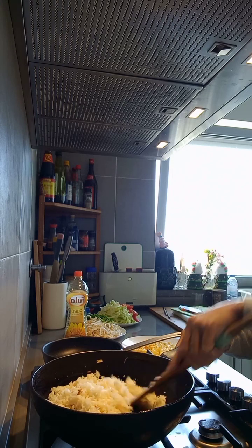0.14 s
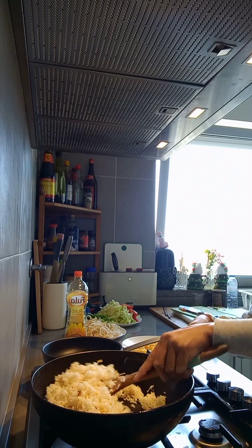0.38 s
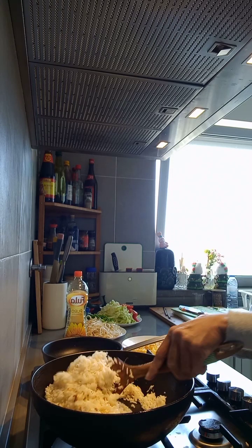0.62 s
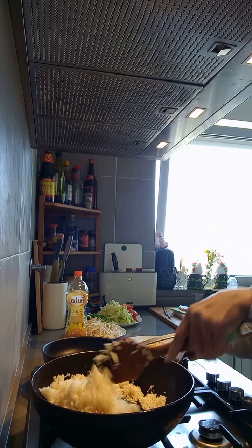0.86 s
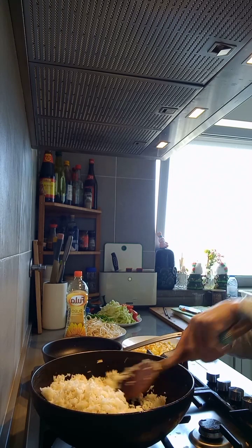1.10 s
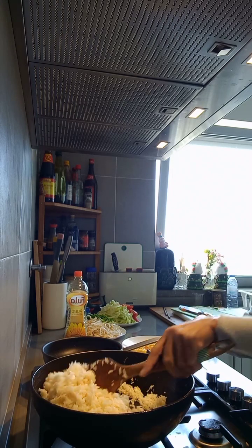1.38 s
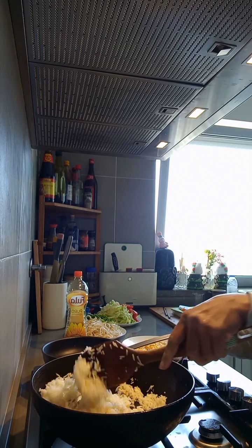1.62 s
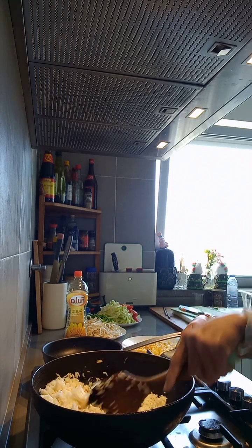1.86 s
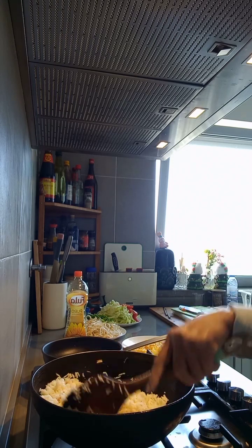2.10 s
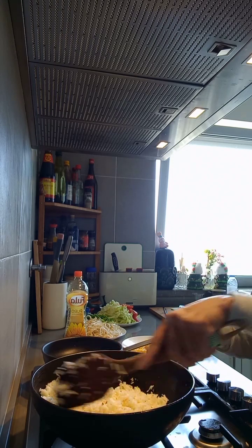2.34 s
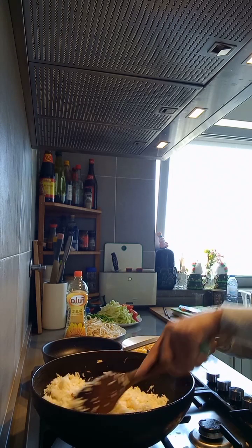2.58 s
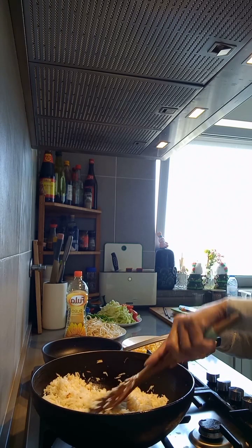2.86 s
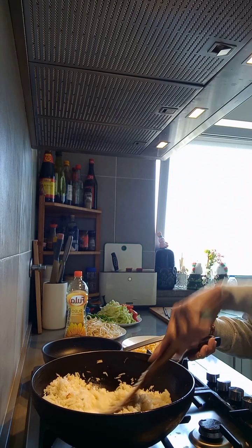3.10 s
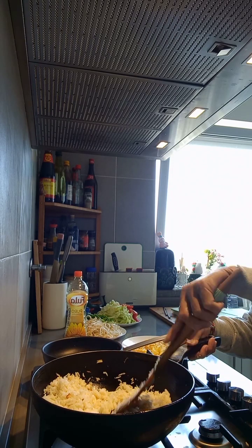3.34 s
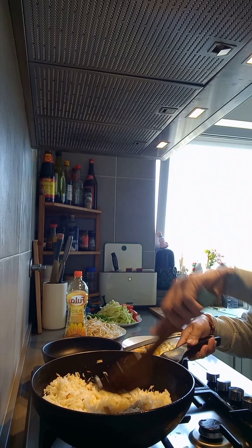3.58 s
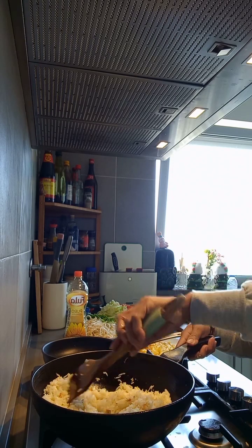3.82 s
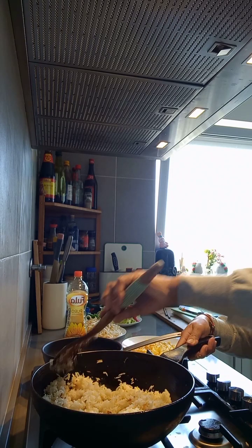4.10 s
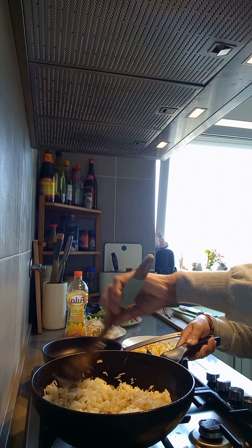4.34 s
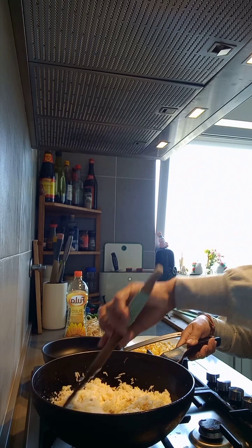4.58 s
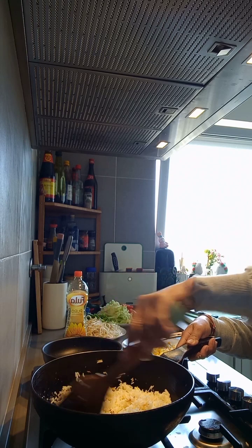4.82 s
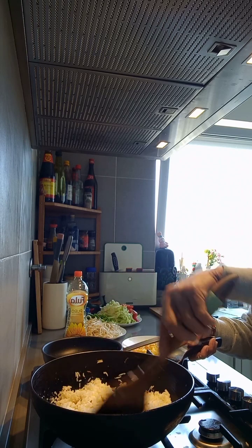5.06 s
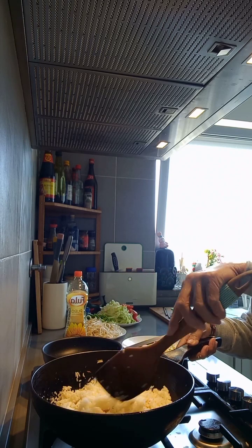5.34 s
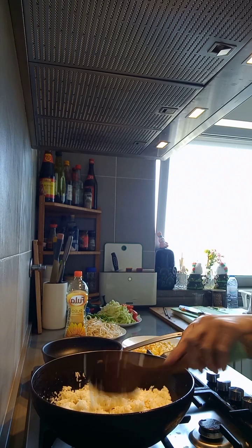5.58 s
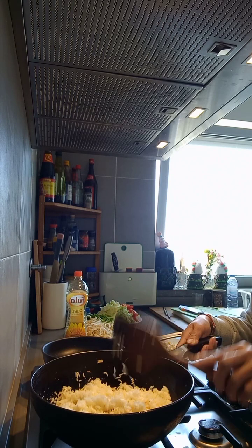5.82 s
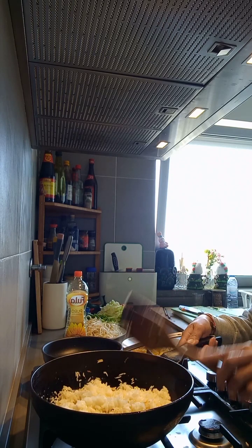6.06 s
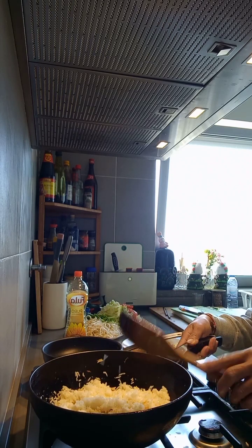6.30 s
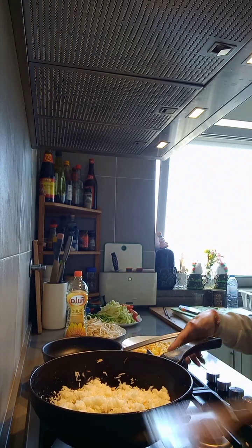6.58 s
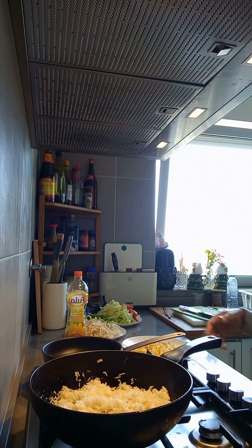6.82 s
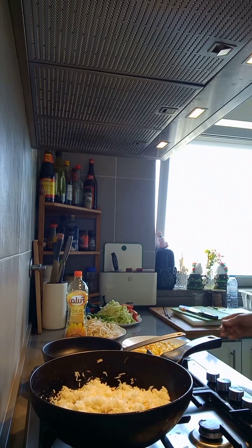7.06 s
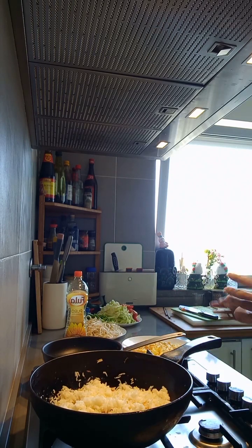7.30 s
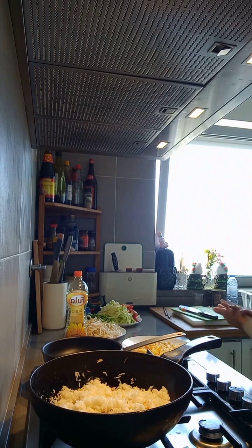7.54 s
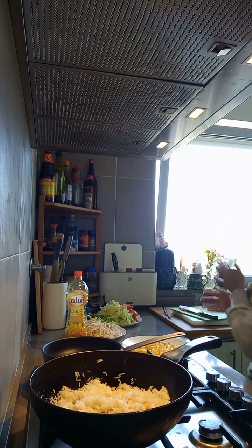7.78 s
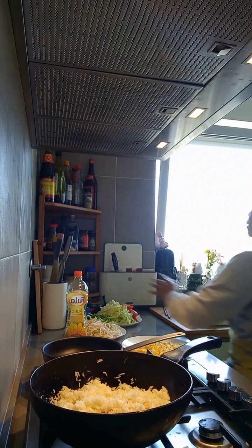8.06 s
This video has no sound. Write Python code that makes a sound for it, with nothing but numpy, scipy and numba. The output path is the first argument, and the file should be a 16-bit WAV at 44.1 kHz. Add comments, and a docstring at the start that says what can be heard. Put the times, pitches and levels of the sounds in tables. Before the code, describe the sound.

In a tiled home kitchen, rice fries with a dense crackling hiss over a low cooker-hood drone. A wooden spatula scrapes and softly thuds through the wok for several seconds, then raps the rim three times, loud and metallic, the wok rattling on its grate. A light touch and a hard dish knock follow, then only quieter sizzle. Close stereo phone microphone.

```python
"""Fat sizzles and a cooker hood drones; wood scrapes and nudges through rice in a steel wok, raps
three times on its rim, touches the worktop and knocks a dish; the level sags after the loud raps.
Sizzle, hood and scraping are shaped noise; every blow rings a bank of decaying modes plus a noise
crack. Frying and blows get a room tail; a phone close by on the worktop adds two unlike ports and
a slow gain control."""
import sys
import numpy as np
from scipy import signal
from scipy.fft import rfft, irfft
from scipy.io import wavfile
from scipy.ndimage import uniform_filter1d
from numba import njit

SR = 44100
rng = np.random.default_rng(int(sys.argv[2]) if len(sys.argv) > 2 else 0)


def store_wav(level_fs):
    """Save 16-bit WAV to argv[1]."""
    pcm = np.round(np.clip(np.atleast_2d(level_fs), -1, 1) * 32767)
    wavfile.write(sys.argv[1], SR, pcm.T.astype(np.int16))


def boost(x):
    """Linear amplitude factor 10**(x/20) for a level x in decibels (scalar or array-like)."""
    u = np.asarray(x, float) / 20
    return 10 ** u


N = 360288
TIME_S = np.arange(N) / SR
LEAD_SAMPLES = 18  # near sound reaches the left port first

# spatula strokes through the rice: start/s, length/s, hob rumble/dB, wood-on-steel scrape/dB,
# flare of the sizzle as fresh rice meets hot steel/dB
STROKES = [(-0.1, 0.75, -32, -38.5, -2.5), (0.715, 0.81, -35.5, -39, 2), (1.14, 0.32, -39, -42, 3.5),
           (1.594, 0.61, -33, -39.5, 0), (2.067, 0.34, -34.5, -37, 2.5), (2.482, 0.2, -36, -40, 4),
           (2.74, 0.34, -36, -42, 2.5), (3.091, 0.19, -35.5, -32.5, -3), (3.367, 1, -40.5, -47, 1),
           (3.832, 0.29, -34, -33.5, 0.5), (4.148, 0.27, -36, -32, 1.5), (4.455, .26, -32.5, -37, 2.5),
           (4.73, 0.46, -39, -44, 1.5), (5.088, 0.3, -42, -33, -1.5), (5.44, 0.73, -38.5, -43, 0.5)]


def shape(x, points):
    """Colour x by (f/Hz, gain/dB) points, interpolated over log frequency."""
    hz, db = np.transpose(points)
    f = np.fft.rfftfreq(x.shape[-1], 1 / SR)
    gain = boost(np.interp(np.log(f + 1), np.log(hz), db))
    return irfft(rfft(x) * gain, x.shape[-1])


def pair(size):
    """Two-port noise: alike in the bass, mostly unrelated in the treble but for a part that leads left."""
    alike_hz = 650  # likeness falls off around here
    f = np.fft.rfftfreq(size, 1 / SR)
    alike = np.exp(-(f / alike_hz) ** 2)
    mid, side, near = rfft(rng.standard_normal((3, size)))
    mid = mid * np.sqrt((1 + alike) / 2)
    side = side * np.sqrt((1 - alike) / 2)
    near = near * 0.39 * np.sqrt(1 - alike) / (1 + (f / 4000) ** 2)
    delay = np.exp(-2j * np.pi * f * LEAD_SAMPLES / SR)
    return irfft(np.array([mid + side + near, mid - side + near * delay]), size)


def level(x, db):
    """Scale x to an rms level, fixed or moving."""
    return x * boost(db) / np.sqrt(np.mean(x ** 2))


def walk(rate_hz):
    """Random levels held 1 / rate_hz and slewed twice; spread near 1."""
    hold = int(SR / rate_hz)
    steps = np.repeat(rng.standard_normal(N // hold + 1), hold)
    return 1.3 * uniform_filter1d(uniform_filter1d(steps, hold), hold)[:N]


def fade(t60_s, size):
    """Exponential decay, 60 dB in t60_s."""
    return np.exp(-np.log(1000) * np.arange(size) / (t60_s * SR))


def pressure():
    """Blade pressure 0-1 of each stroke: a smooth build-up and a longer easing off."""
    rise = 0.24  # share of a stroke
    start_s, length_s = np.array(STROKES)[:, :1], np.array(STROKES)[:, 1:2]
    part = (TIME_S - start_s) / length_s
    ramp = np.clip(np.minimum(part / rise, (1 - part) / (1 - rise)), 0, 1)
    return np.sin(np.pi / 2 * ramp) ** 2


def hood():
    """Broad drone of air in the extractor duct: shaped noise whose level wanders slightly."""
    # drone spectrum: f/Hz, gain/dB
    drone = [(18, -51), (30, -41), (43, -13), (102, 2), (177, -12), (339, -13.5), (439, -24), (710, -16.5),
             (955, -23), (1050, -15.5), (1150, -23.5), (1970, -22), (2500, -58), (3250, -52), (5500, -120)]
    return level(shape(pair(N), drone), -40.5 + 0.7 * walk(3))


def frying():
    """Dense steam bursts of very uneven size gate a hiss; patches of fat flare and die; spits stand out."""
    # fat boiling on the hot steel: t/s, level/dB
    boil = [(0.0, -33.5), (1.1, -37.5), (1.55, -38), (3.0, -35.5), (4.0, -40), (5.5, -37.5), (6.3, -40),
            (6.9, -38.5), (7.4, -41), (7.75, -36), (8.17, -40)]
    # loud spits of fat: t/s, level/dB
    spits = [(2.577, -19), (3.296, -21.5), (3.9794, -24.5), (5.1264, -27), (5.616, -30), (6.7046, -26),
             (7.4699, -29.5), (7.7103, -23.5), (8.024, -23), (8.1377, -30.5)]
    # hiss spectrum: f/Hz, gain/dB
    sizzle = [(300, -18), (900, -32), (1600, -7.5), (2500, -0.5), (5000, -0.5), (9000, -2.5), (15000, 9)]
    # spits carry less top than the hiss: f/Hz, gain/dB
    spit_dull = [(4000, -2), (15000, -6)]
    burst_hz, burst_decay_s = 2500, 0.0009  # decay of burst power
    flare_hz, flare_decay_s, spit_t60_s = 20, 0.0094, 0.055

    bursts = (rng.random(N) < burst_hz / SR) * boost(3.7 * np.minimum(rng.exponential(size=N), 5))
    power = signal.lfilter([1], [1, -np.exp(-1 / (burst_decay_s * SR))], bursts ** 2)
    gate = 0.5 + np.sqrt(power)
    flares = (rng.random(N) < flare_hz / SR) * rng.random(N)
    swell = 1 + 0.83 * signal.lfilter([1], [1, -np.exp(-1 / (flare_decay_s * SR))], flares)
    hiss = shape(pair(N) * gate * swell, sizzle)

    out = 0
    for hz in 300 * 2. ** np.arange(6):  # each octave wavers faintly on its own
        band = [(hz / 2, -60), (hz / 1.46, -6), (hz, 0), (hz * 1.43, -6), (hz * 2, -60)]
        out = out + shape(hiss, band) * boost(0.11 * walk(14))
    flare_db = np.transpose(STROKES)[4] @ pressure()
    out = level(out, np.interp(TIME_S, *np.transpose(boil)) + flare_db)

    for s, db in spits:
        start = int(s * SR)
        size = min(4096, N - start)
        spit = shape(shape(pair(4096), sizzle), spit_dull)[:, :size]
        out[:, start:start + size] += boost(db) * spit * fade(spit_t60_s, size)
    return out


def stirring():
    """Wood slides unevenly over steel: the hob rumbles and the wok's low modes murmur."""
    # hob rumble spectrum: f/Hz, gain/dB
    rumble_tone = [(40, -41), (70, -2), (97, -3), (140, -8.5), (180, -51), (260, -21)]
    # scrape spectrum: f/Hz, gain/dB
    scrape_tone = [(150, -17), (230, 21.5), (350, -1.5), (450, -23), (680, 13.5), (900, -21), (1500, -23),
                   (3000, 6.5)]
    # the blade never quite leaves the rice until it is lifted out
    rest_rumble_db, rest_scrape_db, rest_end_s = -38, -43, 5.7

    rumble_db, scrape_db = np.transpose(STROKES)[2:4]
    push, resting = pressure(), TIME_S < rest_end_s
    rumble_power = boost(2 * rumble_db) @ push + boost(2 * rest_rumble_db) * resting
    scrape_power = boost(2 * scrape_db) @ push + boost(2 * rest_scrape_db) * resting
    rumble = level(shape(pair(N), rumble_tone), 0) * np.sqrt(rumble_power)
    grit = pair(N) * boost(4.5 * walk(40))
    return rumble + level(shape(grit, scrape_tone), 0) * np.sqrt(scrape_power)


@njit
def ring(starts, poles, left, right, lengths, rise):
    """Each struck mode turns and fades as one complex phasor, building up while the contact lasts."""
    out = np.zeros((2, N))
    for k in range(len(starts)):
        z, rest = 1 + 0j, 1.
        for i in range(starts[k], min(N, starts[k] + lengths[k])):
            out[0, i] += (1 - rest) * (z * left[k]).imag
            out[1, i] += (1 - rest) * (z * right[k]).imag
            z, rest = z * poles[k], rest * rise
    return out


def blows(table, share, modes, ring_db, crack_db, crack_t60_s, hum_db, hum_t60_s, contact_s,
          scatter_db=1.5, detune=0.0226, count=3):
    """Each blow rings every mode as a close, beating cluster, over a contact crack and a blur of
    unresolved modes; share is the part of the free ring time left."""
    s, low_db, thud_db, upper_db, bright_db = np.transpose(table)[:, :, None]
    hz, mode_db, free_t60_s = np.repeat(modes, count, axis=0).T
    chance = rng.standard_normal((len(table), 4 * len(hz))).reshape(len(table), 4, -1)

    zones = np.log([90, 200, 400, 650, 1500, 2600])
    columns = np.hstack([thud_db, low_db, upper_db, bright_db])
    force = [(zones, [thud, low, low, upper, upper, bright]) for thud, low, upper, bright in columns]
    struck_db = np.array([np.interp(np.log(hz), *f) for f in force])
    apart = 1 - np.exp(-hz / 500)  # high modes split wider and reach the ports less alike
    gain = boost(struck_db + mode_db + ring_db + scatter_db * chance[:, 0])
    gain = gain * np.exp(3j * apart * chance[:, 3])

    share = (share + 0 * s[:, 0])[:, None]
    # rice and hand damp the ring, but hardly the deep boom of the hob
    t60_s = free_t60_s * share ** np.minimum(hz / 200, 1)
    split_hz = hz * (1 + detune * apart * chance[:, 1])
    poles = np.exp(2j * np.pi * split_hz / SR - np.log(1000) / (t60_s * SR))
    turn = np.exp(2j * np.pi * hz * apart * LEAD_SAMPLES / SR * (1 + chance[:, 2] / 3))
    starts = (s * SR + 0 * hz).astype(np.int64)
    lengths = (t60_s * SR).astype(np.int64)
    out = ring(starts.ravel(), poles.ravel(), (gain * turn).ravel(), gain.ravel(), lengths.ravel(),
               np.exp(-1 / (contact_s * SR)))

    size = 16384
    onset = 1 - np.exp(-np.arange(size) / (contact_s * SR))
    for start, (z, dbs), part in zip(starts[:, 0], force, share[:, 0]):
        tone = [(55, dbs[0] - 25)] + list(zip(np.exp(z), dbs))
        tone = tone + [(7000, dbs[-1] - 12.5), (12000, dbs[-1] - 20)]
        crack = boost(crack_db) * fade(crack_t60_s, size)
        hum = boost(hum_db) * fade(hum_t60_s * part, size)
        out[:, start:start + size] += shape(pair(size), tone) * (crack + hum) * onset
    return out


def blade_touches():
    """Soft nudges, and one bright scraping swish at 3.875 s, ring the blade and the rice-damped wok floor."""
    # nudges and the swish: t/s, low body/dB, thud/dB, upper body/dB, bright/dB
    touches = [(0.035, -21, -38, -23.5, -22), (0.044, -17.5, -27, -27.5, -40), (0.067, -24, -26, -51, -40),
               (1.075, -35, -36, -30, -37), (2.183, -26.5, -34, -28, -38), (2.219, -34, -31, -53, -38),
               (2.445, -27, -28, -35.5, -54), (2.471, -32, -45, -37, -47), (2.5, -31, -46, -33, -37),
               (3.139, -29.5, -33, -41, -43), (3.875, -44, -38, -40, -30), (4.189, -33, -17, -38, -53),
               (4.384, -33, -27, -50, -51), (4.436, -21, -21, -29.5, -51), (4.469, -26, -31, -33, -48),
               (4.715, -25, -36, -27, -50), (4.821, -28.5, -28, -40, -50), (5.105, -35.5, -32, -37.5, -42),
               (5.154, -24, -33, -44, -47), (5.19, -27.5, -39, -44, -47)]
    # blade and wok floor modes: f/Hz, level/dB, free t60/s
    spatula = [(98, -8, 0.26), (138.5, -4, 0.21), (229, -1, 0.14), (284.5, -1.5, 0.13), (346, -9, 0.16),
               (679, 9.5, 0.069), (910, -5, 0.074), (1000, -3, 0.086), (1300, 0, 0.056), (2650, -1, 0.071),
               (3370, 12, 0.057)]
    return blows(touches, 0.57, spatula, ring_db=-7.0, crack_db=5.8, crack_t60_s=0.19,
                 hum_db=-0.89, hum_t60_s=0.13, contact_s=0.002)


def wok_knocks():
    """Wood strikes the bare steel; the wok chatters back onto its grate, which cuts its ring shorter."""
    # wood on steel: t/s, low body/dB, thud/dB, upper body/dB, bright/dB
    raps = [(2.575, -50, -57, -38.5, -44), (5.775, -8, -23.5, -15.5, -28.5),
            (5.993, -11.5, -21, -18, -28.5), (6.2345, -10.5, -23, -17, -23)]
    # wok on grate: t/s, low body/dB, thud/dB, upper body/dB, bright/dB
    chatter = [(5.833, -21, -45, -20, -12.5), (5.841, -10.5, -10.5, -37, -23.5),
               (6.046, -10.5, -15, -33, -16.5), (6.056, -16, -13, -21, -44), (6.249, -12, -32, -18.5, -25),
               (6.264, -24, -20, -22, -33), (6.281, -24, -19, -26, -20), (6.287, -15, -43, -25, -31),
               (6.322, -19, -19, -40, -26)]
    # wok modes: f/Hz, level/dB, free t60/s
    wok = [(80.5, -5, 1), (144.6, -0.5, 0.27), (203, -12.5, 0.66), (236.5, -3.5, 0.28), (286, -5, 0.28),
           (346, -5.5, 0.3), (511, 2, 0.15), (626, 3, 0.09), (651, 4.5, 0.13), (702, -4, 0.3),
           (830, -33, 0.47), (1043, 4, 0.16), (1115, 7, 0.26), (1270, -21, 0.48), (1439, -2.5, 0.48),
           (1597, 5, 0.13), (1813, 2, 0.12), (1965, 5.5, 0.074), (2115, 1, 0.1), (2726, 2.5, 0.25),
           (2672, 3, 0.18), (3260, 6.5, 0.094), (3450, -6, 0.27), (3770, -5.5, 0.24), (3960, -2, 0.51),
           (5570, 3.5, 0.16), (6000, -6, 0.25), (7400, -29, 0.22)]
    share = np.repeat([0.78, 0.36], [len(raps), len(chatter)])
    return blows(raps + chatter, share, wok, ring_db=-6.5, crack_db=21, crack_t60_s=0.045,
                 hum_db=7.4, hum_t60_s=0.75, contact_s=0.002)


def worktop_and_dish():
    """The spatula touches the worktop, then knocks a dish and bounces; all three ring one set of modes."""
    # worktop touch, dish knock, bounce: t/s, low body/dB, thud/dB, upper body/dB, bright/dB
    landings = [(6.819, -16.5, -21, -25.5, -42), (6.928, -10, -15, -9, -24.5),
                (6.971, -19.5, -40, -14.5, -29)]
    # dish modes: f/Hz, level/dB, free t60/s
    dish = [(124, -13, 0.54), (231, -4, 0.2), (368, -3, .3), (640, -8, 0.2), (755, 4, 0.11), (797, 0, 0.3),
            (1006, 6, 0.16), (1097, 3, 0.17), (1390, -16, 0.36), (1590, -4, 0.15), (2042, 3, 0.37),
            (2410, -7, 0.3), (2834, -6.5, 0.66), (3745, -3.5, 0.56), (4740, 3.5, 0.22), (5880, -10, .25),
            (7354, -9, 0.27)]
    return blows(landings, 0.45, dish, ring_db=-2.9, crack_db=9.2, crack_t60_s=0.04,
                 hum_db=8.9, hum_t60_s=0.34, contact_s=0.0005, detune=0.0076)


def kitchen(x, wet_db, t60_low_s=0.42, t60_high_s=0.46, split_hz=1500):
    """Tiles and steel return a dense noise tail, slightly longer in the treble."""
    size = 32768
    noise = shape(pair(size), [(90, -36), (200, -10)])  # the tail carries little bass
    low = shape(noise, [(split_hz / 2, 0), (split_hz * 2, -30)])
    tail = low * fade(t60_low_s, size) + (noise - low) * fade(t60_high_s, size)
    tail = tail * np.minimum(np.arange(size) / (0.00073 * SR), 1)  # onset ramp
    tail = boost(wet_db) * tail / np.sqrt(np.sum(tail ** 2) / 2)
    return x + signal.fftconvolve(x.mean(axis=0)[None], tail, axes=1)[:, :N]


def scene():
    """Knocks and frying sound in the room; stirring and hood are added dry."""
    knocks = wok_knocks() + worktop_and_dish() + blade_touches()
    return kitchen(knocks, -2.0) + kitchen(frying(), 0.39) + stirring() + hood()


@njit
def follow(x, attack, release, start):
    """Peak follower: quick up, slow down."""
    out, e = np.empty(len(x)), start
    for i in range(len(x)):
        e += (x[i] - e) * (attack if x[i] > e else release)
        out[i] = e
    return out


def top_cut(x):
    """Nothing passes above the cut-off."""
    return signal.sosfilt(signal.butter(12, 16500, fs=SR, output="sos"), x)


def record(dry):
    """Two ports of unlike colour, a gain control that recovers slowly, a soft ceiling, a low-pass."""
    # port responses: f/Hz, gain/dB
    left_port = [(20, -38), (45, 2), (150, 1.5), (177, -11.5), (205, 1.5), (400, -1.5), (6000, 0),
                 (8500, 5), (9900, -2.5), (12700, 1), (15400, 2.5)]
    # f/Hz, gain/dB
    right_port = [(20, -38), (45, 2.5), (150, 2.5), (177, -2), (205, 4), (400, -0.5), (4800, -2),
                  (6800, -12), (8000, -56), (8700, -20.5), (10600, -15.5), (12500, -12), (15400, -13)]
    knee, attack_s, release_s, top_hz = boost(-22), 0.08, 3.2, 15550

    ports = np.array([shape(dry[0], left_port), shape(dry[1], right_port)])
    loud = follow(np.abs(ports).max(axis=0), 1 / (attack_s * SR), 1 / (release_s * SR), knee)
    ports = ports * np.minimum(knee / loud, 1) ** 0.3
    low_pass = signal.ellip(8, 0.2, 70, top_hz, fs=SR, output="sos")
    mix = signal.sosfilt(low_pass, np.tanh(ports))
    return top_cut(mix)


dry = scene()
out = record(dry)
store_wav(out)
```